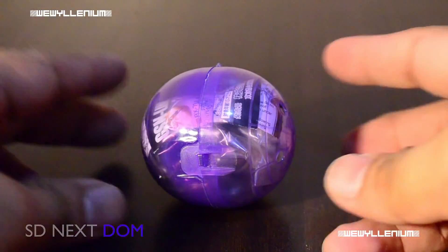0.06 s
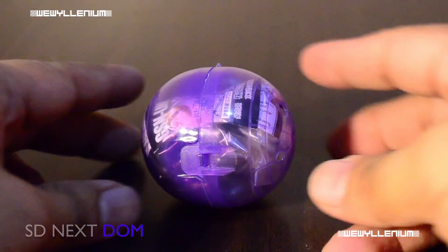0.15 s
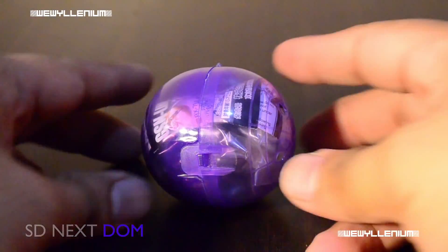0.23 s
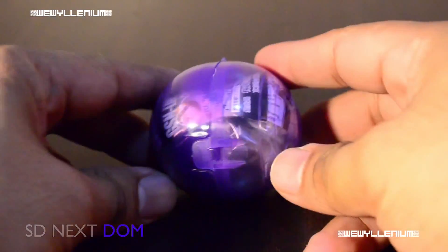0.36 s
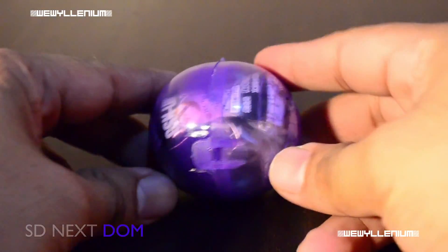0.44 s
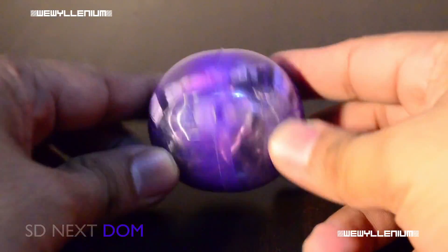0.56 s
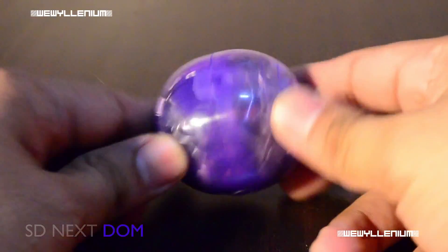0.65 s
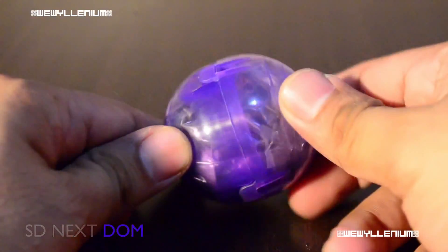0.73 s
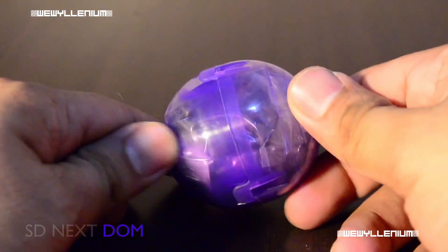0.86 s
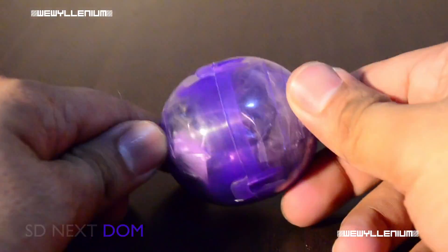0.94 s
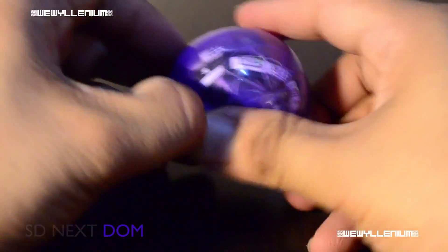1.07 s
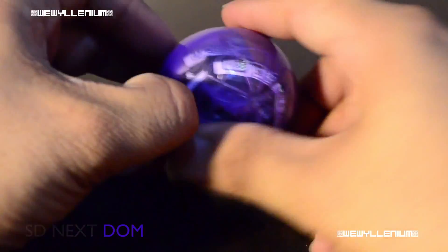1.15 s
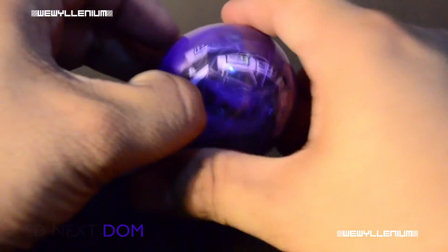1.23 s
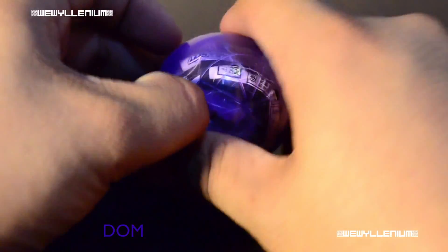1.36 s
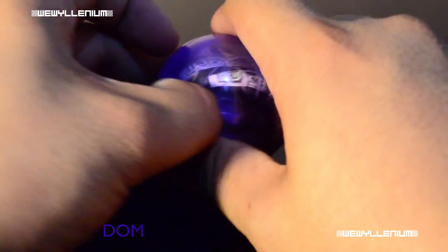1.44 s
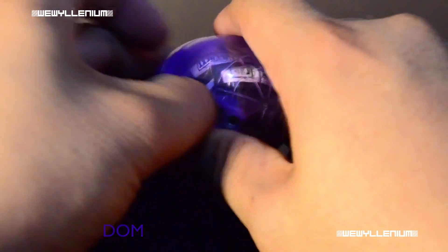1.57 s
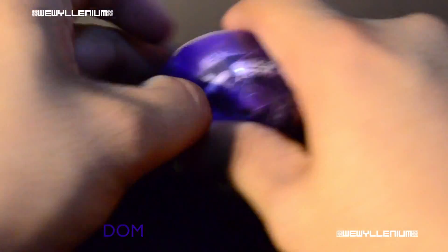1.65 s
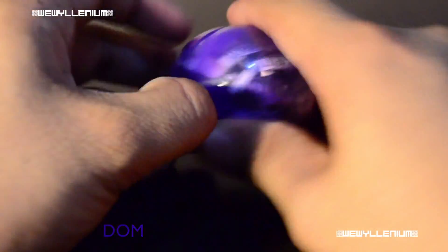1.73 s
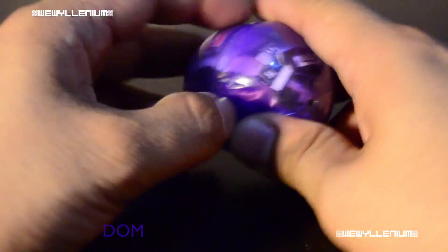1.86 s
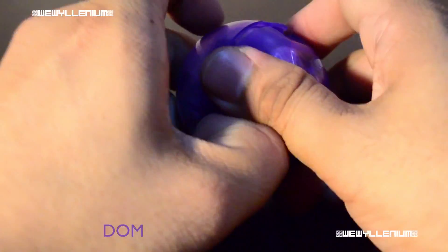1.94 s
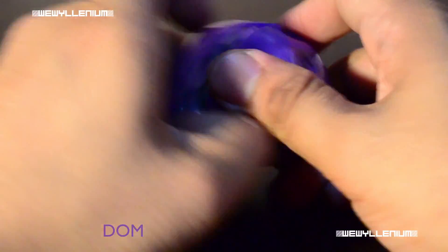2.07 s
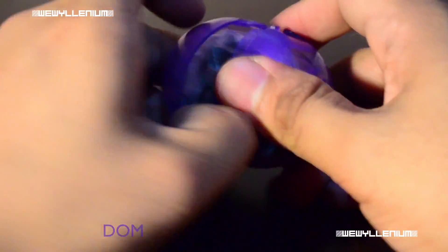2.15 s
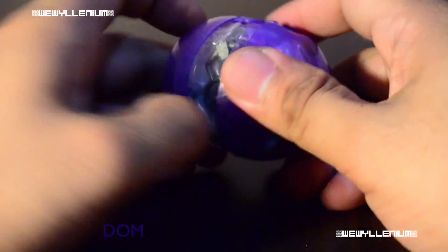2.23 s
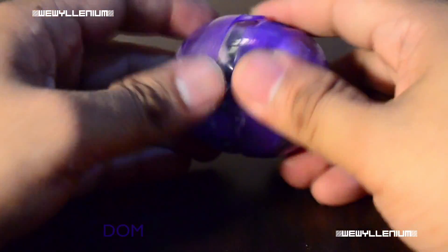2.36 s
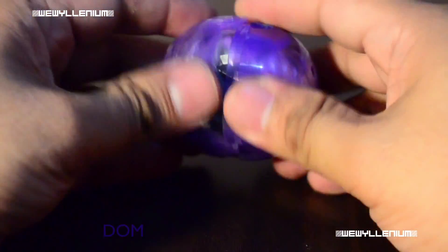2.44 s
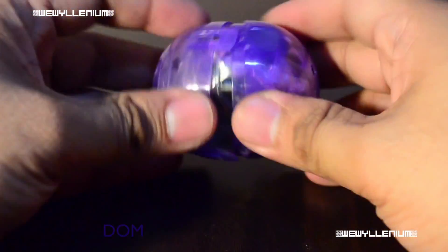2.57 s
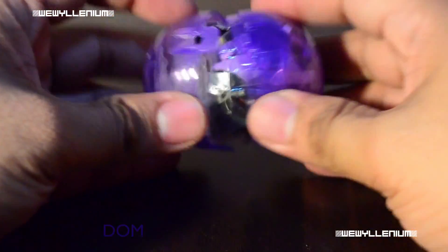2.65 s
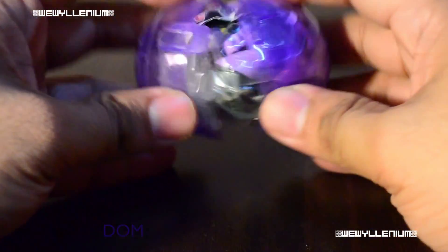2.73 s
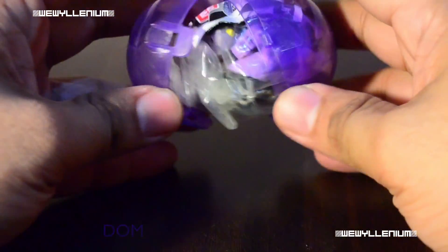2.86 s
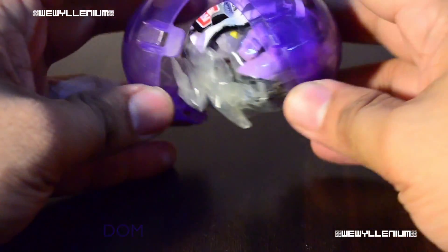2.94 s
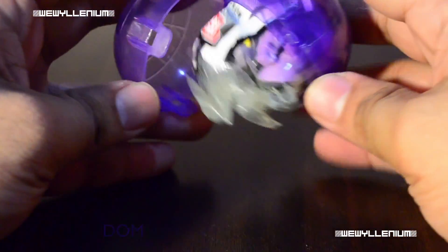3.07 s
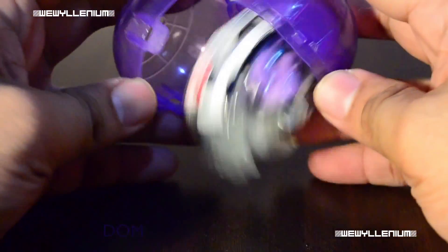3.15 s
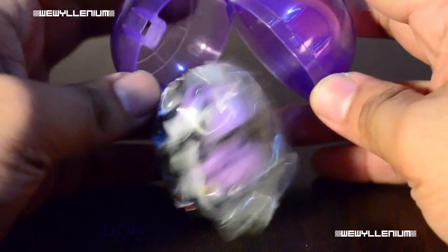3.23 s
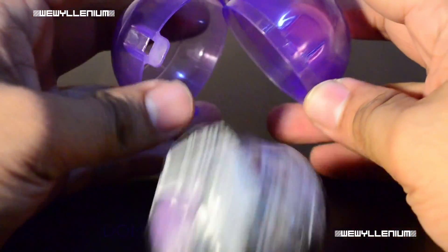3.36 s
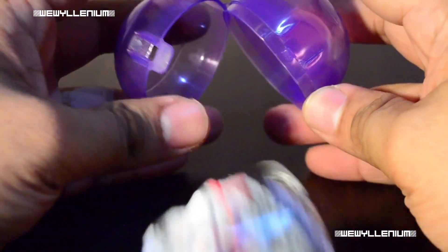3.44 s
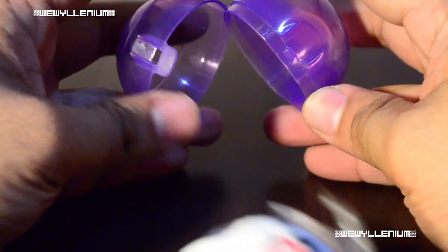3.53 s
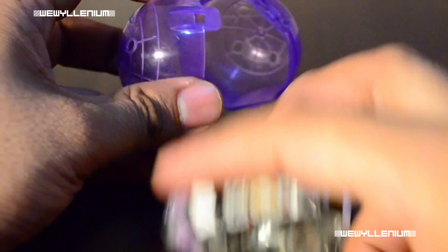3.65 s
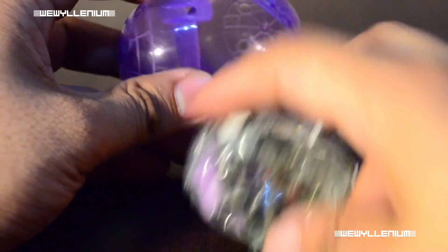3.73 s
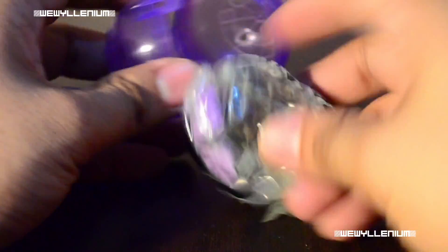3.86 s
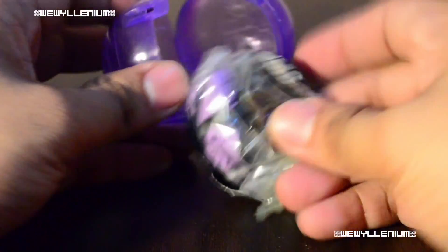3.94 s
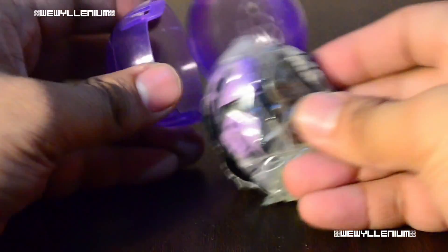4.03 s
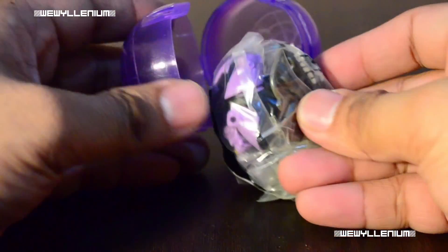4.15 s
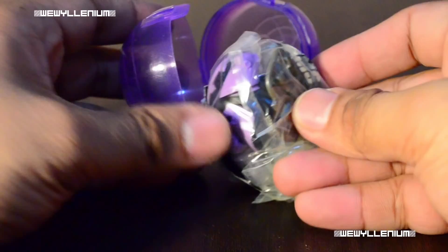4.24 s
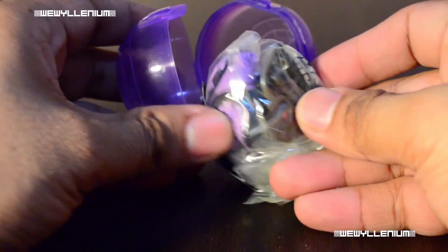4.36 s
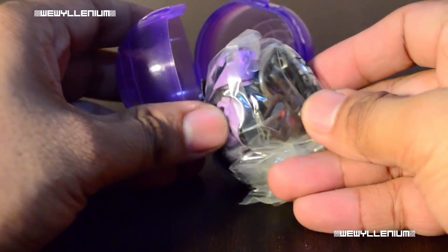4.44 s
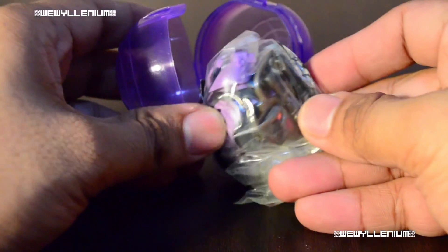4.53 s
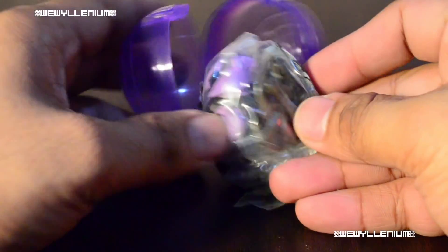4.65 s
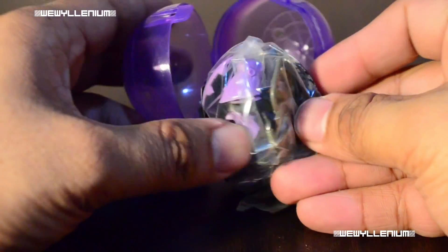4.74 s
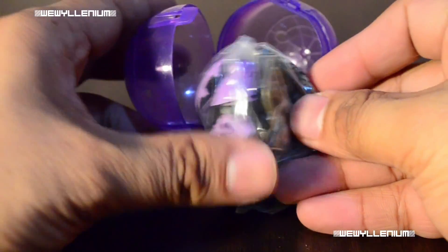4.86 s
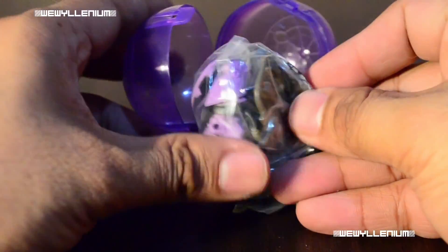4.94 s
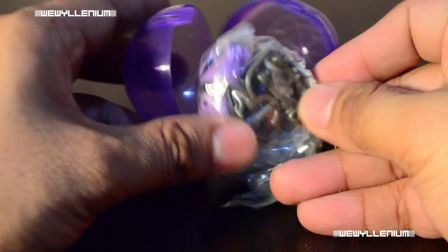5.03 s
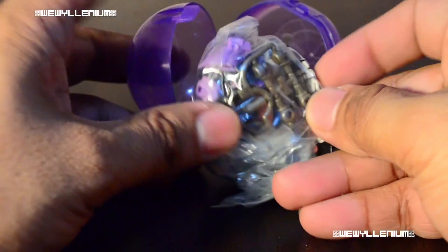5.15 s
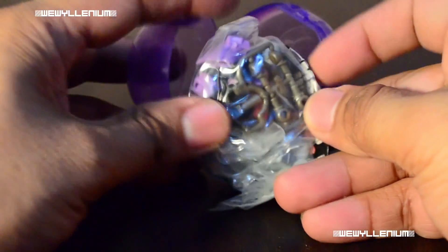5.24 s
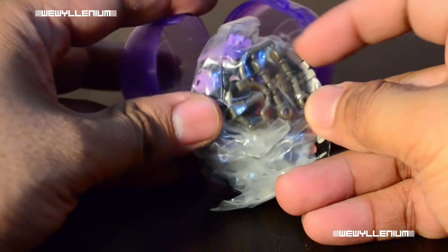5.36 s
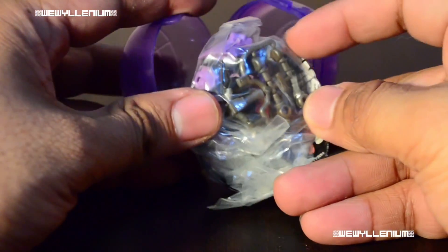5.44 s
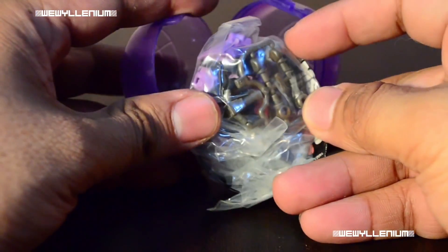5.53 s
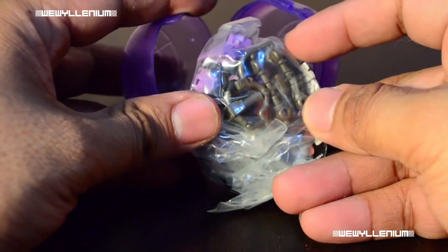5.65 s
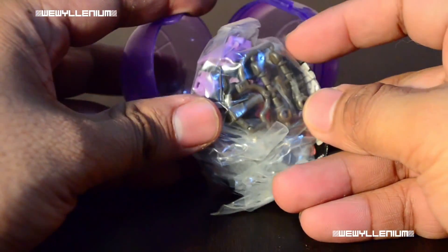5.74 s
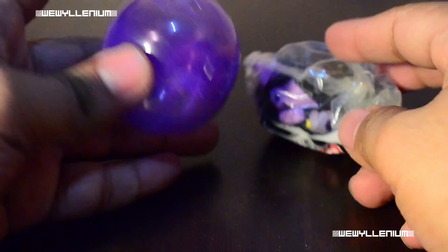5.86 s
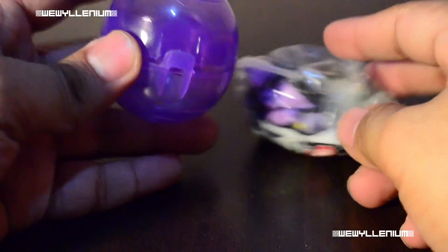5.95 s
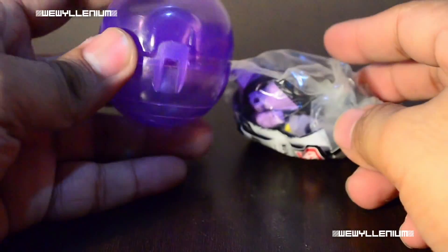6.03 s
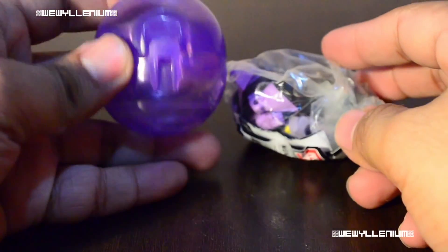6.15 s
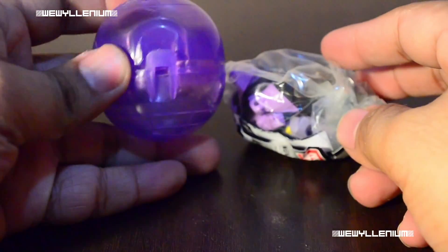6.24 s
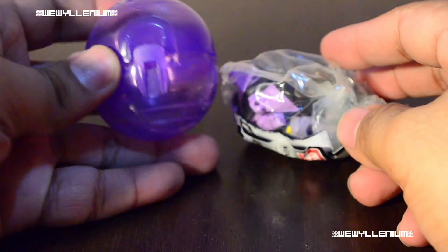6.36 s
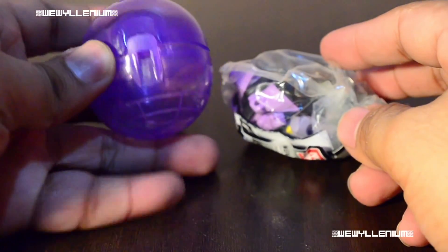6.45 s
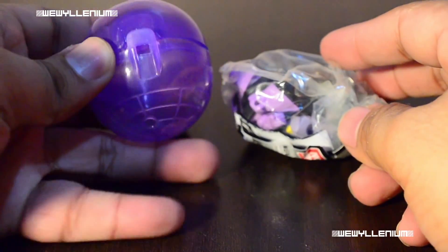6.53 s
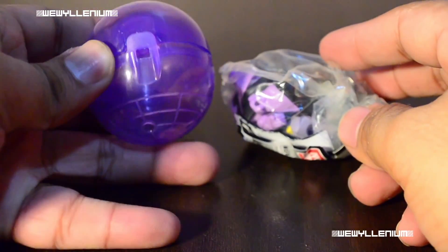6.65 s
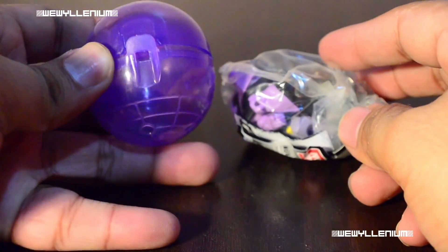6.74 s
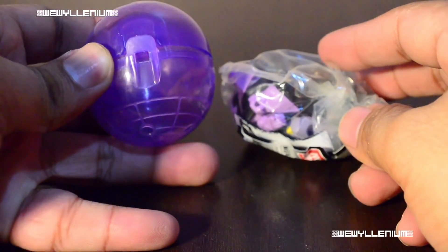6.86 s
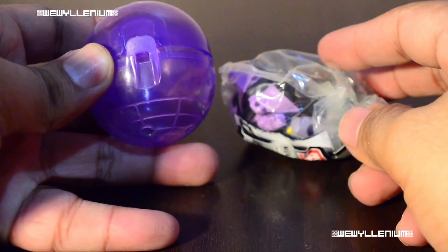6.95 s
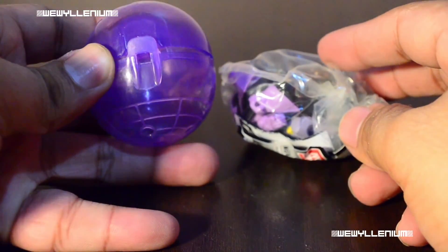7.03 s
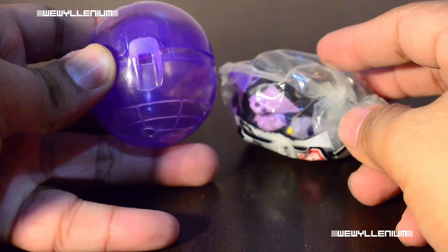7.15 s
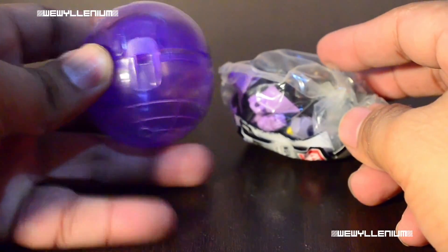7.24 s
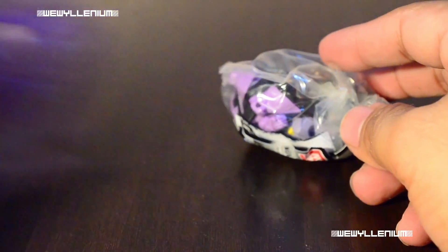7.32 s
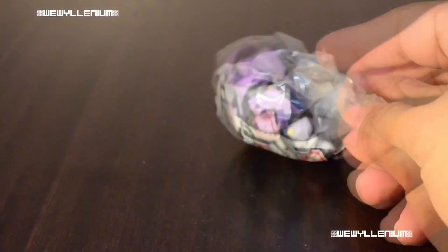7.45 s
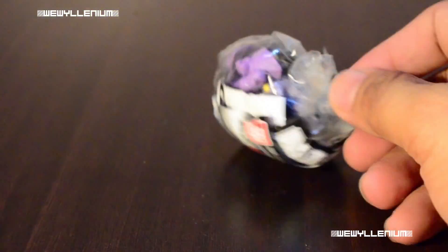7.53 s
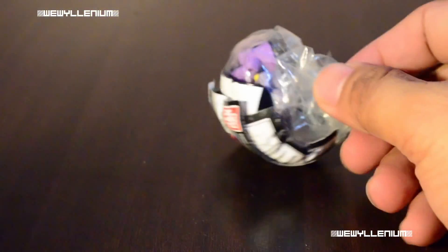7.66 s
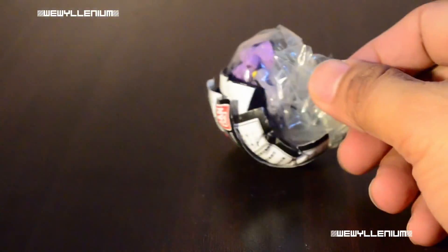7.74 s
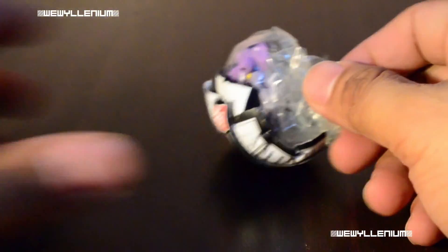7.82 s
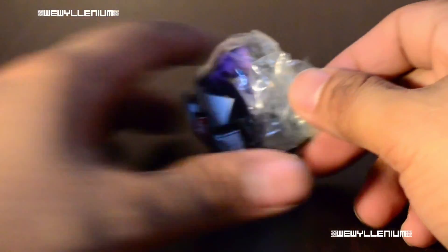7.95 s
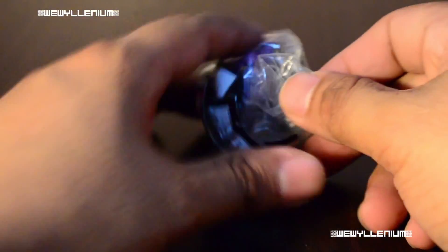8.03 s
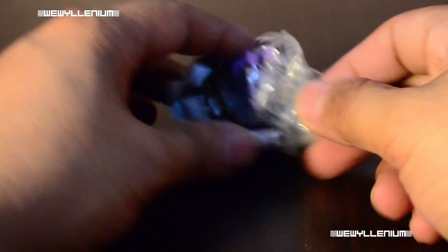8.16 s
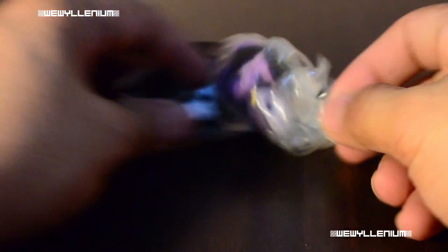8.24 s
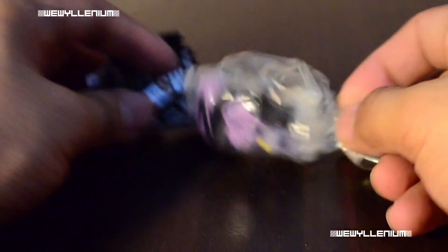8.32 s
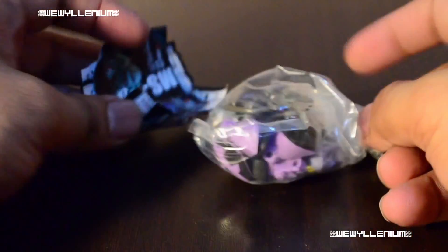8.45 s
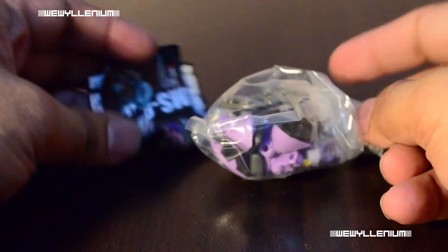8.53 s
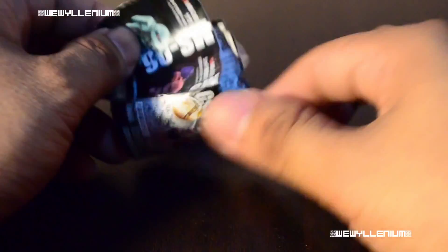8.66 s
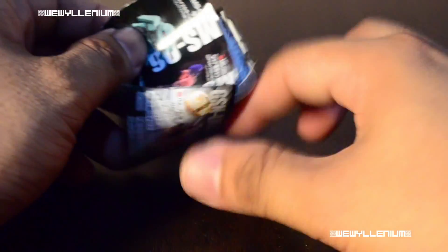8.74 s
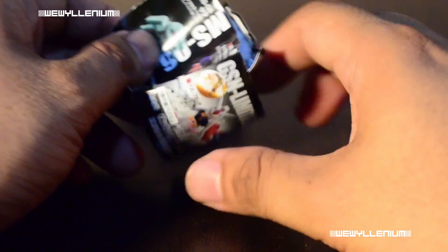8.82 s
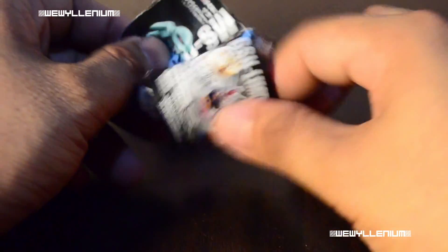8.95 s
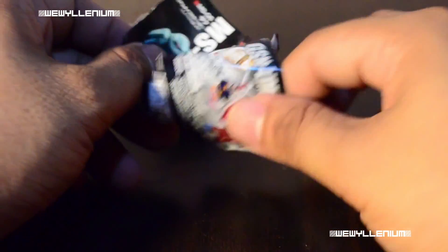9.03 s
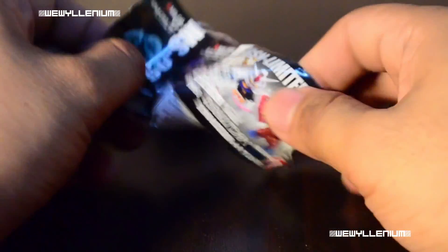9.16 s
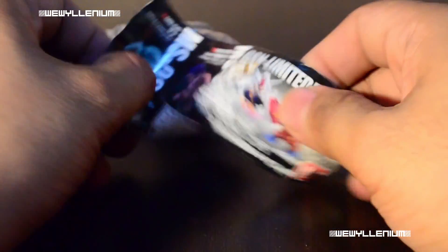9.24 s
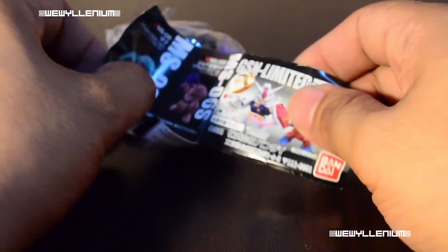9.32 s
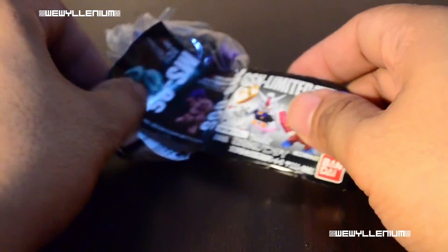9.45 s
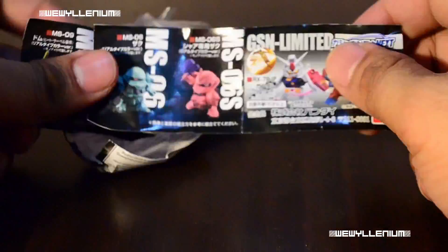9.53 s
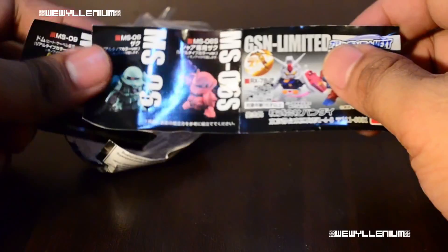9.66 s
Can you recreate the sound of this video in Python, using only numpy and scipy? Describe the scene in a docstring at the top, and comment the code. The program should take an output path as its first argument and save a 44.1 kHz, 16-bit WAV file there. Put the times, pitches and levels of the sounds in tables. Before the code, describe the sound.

Close up on a table, fingers rub and pop open a plastic shell, then thin wrapping crackles and folded paper rustles open in a small room.

```python
"""A hollow plastic toy capsule is prised open over a table in a small, hard-walled room: its catch snaps
three times, each snap a short body ring plus a bright noise crack. A figure in a crackly plastic bag is
pulled out and turned over (clumped ticks ringing small facets), the empty shell is set aside with modal
table knocks, and a folded paper leaflet is peeled off the bag and opened (finer ticks, two hollow pops).
Dense wall echoes, steady room air, hiss and a thin whine lie behind."""
import sys
import numpy as np
from scipy import signal
from scipy.fft import rfft, irfft
from scipy.io import wavfile

SR = 44100
rng = np.random.default_rng(int(sys.argv[2]) if len(sys.argv) > 2 else 0)


def log_audio(samples):
    """Write samples as a 16-bit WAV file to the path given in sys.argv[1]."""
    # one column per channel
    frames = np.atleast_2d(samples).T
    # limit to full scale, then quantise
    limited = np.clip(frames, -1, 1)
    pcm = np.round(limited * 32767).astype(np.int16)
    wavfile.write(sys.argv[1], SR, pcm)


N = 427329
TIME = np.arange(N) / SR

# Colour of hiss on the shell and fine crackle of the bag. Each row: frequency in Hz, relative density in dB.
SIZZLE_COLOUR = [(1500, -7.5), (3000, -14.5), (4500, 0), (6500, -1.5), (8500, -2.5), (10500, -8),
                 (13000, -23.5), (16000, -43)]


def capsule():
    """The stiff shell: hollow snaps and the rub of sliding contact. Gives (direct, sent to the room)."""
    # Taps on the shell and snaps of its catch. Each row: start in seconds, body level in dB,
    # body pitch in Hz, edge level in dB; levels before layer gain.
    shell_snaps = [(0.075, -47, 760, -59), (1.079, -50.5, 2330, -51), (1.29, -43.5, 1810, -41.5),
                   (1.4569, -49, 1260, -56), (1.6254, -36.5, 870, -25.5), (1.6283, -13, 950, -22),
                   (1.814, -42, 1280, -49), (1.8362, -11.5, 1210, -21.5), (2.1332, -6.5, 1240, -14.5),
                   (2.1368, -22, 1120, -36.5), (2.2634, -41.5, 1800, -47), (2.3485, -39.5, 1360, -41),
                   (2.544, -34.5, 1340, -57), (2.555, -44, 1300, -63), (2.584, -36, 1310, -58),
                   (2.7256, -53, 1610, -59), (2.7456, -49, 1650, -58)]
    # Colour of the shell's crack. Each row: frequency in Hz, relative density in dB.
    shell_edge_colour = [(900, -16.5), (2000, -7.5), (2900, 8), (4200, -6.5), (6500, 0), (8500, -2),
                         (10500, -8), (13000, -23), (16000, -28.5)]
    # Fingertips sliding on the shell, and at 3.1 s the bag sliding faintly. Each row: strongest moment
    # in seconds, length in seconds, rub level in dB, hiss level in dB; levels before layer gain.
    slides = [(.4, 0.33, -57.5, -64), (.545, 0.054, -46, -61), (.765, 0.19, -50, -64),
              (.95, 0.22, -75, -61), (1.1, .05, -53, -51.5), (1.3, 0.048, -41.5, -53),
              (1.495, 0.2, -55.5, -65), (1.78, 0.13, -52.5, -63), (2.346, 0.054, -49, -51),
              (2.53, 0.17, -52.5, -59), (2.595, 0.032, -54, -63), (2.72, 0.51, -60, -64),
              (3.1, 0.26, -63.5, -62.5), (6.565, 0.13, -55.5, -60), (7.94, 0.27, -52, -56.5)]
    # Colour of the rub. Each row: frequency in Hz, relative density in dB.
    rub_colour = [(150, -13), (270, 2.5), (500, 2), (900, 3.5), (1500, 5), (2500, -0.5), (4500, -5.5),
                  (9000, -33)]
    cavity_hz, cavity_width_hz, cavity_db = 397, 130, -1.5  # the air inside the shell

    hits = cracks(shell_snaps, hz=6060, t60_s=0.031)
    body, edge, body_wide, edge_wide = snaps(
        hits, shell_edge_colour, scatter=0.6, body_width_hz=440,
        edge_focus=0.51, edge_width_hz=980, edge_length=0.71)
    body = body + from_db(cavity_db) * resonate(body, cavity_hz, cavity_width_hz)

    rub_gain, hiss_gain = strokes(slides, rise=0.51)
    rub = crackle(rub_colour, per_s=5500, spread_db=4.5, clump_db=5, smooth=.9, sharpness=2.7)
    hiss = crackle(SIZZLE_COLOUR, per_s=1500, spread_db=1.0, clump_db=7.5, smooth=.8, sharpness=3.1)
    slide = from_db(-1.0) * rub_gain * rub + from_db(-3.0) * hiss_gain * hiss

    direct = from_db(-0.8) * body + from_db(-3.0) * edge + slide
    sent = from_db(-0.5) * body_wide + from_db(-0.45) * edge_wide + slide
    return direct, sent


def cracks(rows, hz, t60_s):
    """Brighter snaps slip at a higher pitch for longer; hz and t60_s hold where edge and body are equal."""
    hz_doubles_db, t60_doubles_db = 18.5, 23  # dB of edge over body for each doubling
    rows = np.array(rows)
    _, body_db, _, edge_db = rows.T
    bright_db = edge_db - body_db
    return np.c_[rows, hz * 2 ** (bright_db / hz_doubles_db), t60_s * 2 ** (bright_db / t60_doubles_db)]


def snaps(rows, edge_colour, scatter, body_width_hz, edge_focus, edge_width_hz, edge_length, size=2205):
    """A snap rings the body for a few cycles while the slipping edge gives a bright crack.
    Gives body and edge as heard directly, then as spread into the room."""
    build_s = 0.0018  # a slip spreads along the edge before the crack is at full strength
    mean_bounce_s = .0007  # each crack also arrives off the table top
    out, t, pulse = np.zeros((4, N)), np.arange(size) / SR, signal.unit_impulse(size)
    noises = rng.standard_normal((len(rows), 2, size))
    facets = 2400 * 4 ** rng.random((len(rows), 3))
    delays = mean_bounce_s * (.5 + rng.random(len(rows)))

    def attack_one(v):
        """Unit RMS over the first 5 ms."""
        return v / np.sqrt(np.mean(v[:220] ** 2))

    def spread(smooth, heard):
        """Summed over all directions the same energy has a smooth spectrum."""
        return smooth * np.linalg.norm(heard) / np.linalg.norm(smooth)

    for (s, body_db, body_hz, edge_db, edge_hz, t60_s), noise, facet_hz, delay_s in zip(
            rows, noises, facets, delays):

        def body(push):
            """Two resonances in series at the body pitch."""
            ring = resonate(push, body_hz, body_width_hz)
            return attack_one(resonate(ring, body_hz, 2 * body_width_hz))

        def edge(push):
            """Every spot that gives way also rings a few small facets of its own."""
            tinted = push + 1.5 * sum(resonate(push, hz, 550) for hz in facet_hz)
            focus = attack_one(resonate(push, edge_hz, edge_width_hz))
            return attack_one(attack_one(tinted) + edge_focus * focus)

        # one main release, then a shudder of smaller slips
        shudder = body(noise[0] * fade(t, t60_s))
        knock = attack_one(body(pulse) + scatter * shudder)
        slip = noise[1] * fade(t, t60_s * edge_length) * (1 - fade(t, build_s))
        crack = edge(colour(slip, edge_colour))
        knock_wide = spread(body(pulse), knock)
        crack_wide = spread(edge(colour(pulse, edge_colour)), crack)
        parts = knock, off_table(crack, delay_s), knock_wide, crack_wide
        for track, part, db in zip(out, parts, (body_db, edge_db) * 2):
            add(track, s, from_db(db) * part)
    return out


def off_table(x, delay_s):
    """The direct sound plus its reflection from the table top, scaled back for the added energy."""
    n, gain = np.arange(len(x)), from_db(-9)
    bounce = np.interp(n - round(delay_s * SR), n, x, left=0)
    return (x + gain * bounce) / np.hypot(1, gain)


def wrapping():
    """Thin film: loud buckles amid fine crackle, and a faint squeak. Gives (direct, sent to the room)."""
    # Loudest creases of bag and paper buckling. Each row: start in seconds, body level in dB,
    # body pitch in Hz, edge level in dB; levels before layer gain.
    creases = [(2.8036, -30.5, 1720, -28), (2.9543, -72, 1900, -55.5), (3.1852, -42, 1500, -50.5),
               (3.3029, -32.5, 1720, -29.5), (3.5003, -48.5, 2000, -38.5), (3.5796, -45.5, 1360, -54),
               (3.6551, -42, 1220, -50), (3.8237, -39, 1850, -47), (3.9135, -36.5, 2030, -36),
               (3.939, -38, 1710, -38.5), (4.006, -37, 2070, -34.5), (4.0297, -36.5, 2050, -29),
               (4.1004, -36.5, 2160, -29), (4.2449, -42.5, 1690, -66), (4.2713, -42, 1840, -42),
               (4.2777, -48, 1330, -30.5), (4.4522, -40, 1980, -36), (4.5071, -38, 1020, -43),
               (4.5397, -46.5, 890, -34.5), (4.5586, -44, 1640, -42), (4.7103, -41, 2030, -39.5),
               (4.7788, -50, 2280, -38.5), (4.8582, -48, 2190, -45.5), (4.8098, -40, 2210, -52),
               (4.9099, -32, 1470, -39.5), (4.9442, -34.5, 1680, -39), (5.0249, -36.5, 1380, -41.5),
               (5.0719, -37.5, 1940, -30.5), (5.0983, -32.5, 2360, -28.5), (5.179, -39.5, 1420, -52),
               (5.2339, -31.5, 1050, -55), (5.2685, -45, 1770, -42), (5.3068, -35.5, 2200, -31),
               (5.3509, -35, 1370, -64), (5.5505, -43.5, 1980, -50), (5.828, -58.5, 1980, -58),
               (6.0692, -45.5, 1247, -45), (7.5772, -55, 2880, -40), (7.5936, -38.5, 1630, -40),
               (7.6996, -52.5, 1862, -52), (8.0425, -41, 1680, -39.5), (8.1222, -47, 1700, -40.5),
               (8.225, -37.5, 2400, -53), (8.244, -20, 1340, -23.5), (8.2705, -31.5, 2800, -35),
               (8.2857, -33, 1280, -31.5), (8.44, -38, 2000, -40.5), (9.0106, -48, 1550, -35),
               (9.0261, -43, 1180, -38.5), (9.076, -44, 1330, -43), (9.1296, -40.5, 1080, -43),
               (9.2951, -33.5, 970, -30), (9.3249, -42, 1090, -32), (9.4213, -42, 2560, -42.5),
               (9.4624, -44.5, 3060, -40)]
    # Colour of the creases' cracks. Each row: frequency in Hz, relative density in dB.
    crease_edge_colour = [(100, -34), (500, -29), (1200, 1), (2500, -2.5), (4000, 1), (6500, -2.5),
                          (8500, -1), (10500, -6), (13000, -21), (16000, -25.5)]
    # The bag squeezed or dragged. Each row: strongest moment in seconds, length in seconds,
    # crumple level in dB, sizzle level in dB; levels before layer gain.
    handling = [(3.317, 0.027, -34.5, -42), (3.37, 0.091, -56, -49.5), (3.515, 0.03, -36, -66),
                (3.77, 0.1, -52, -54), (3.86, 0.081, -42, -47), (3.9, 0.094, -43.5, -44),
                (4.285, 0.059, -65, -64), (4.75, .06, -46.5, -52), (4.93, .055, -35.5, -48),
                (5.1, 0.088, -37.5, -42), (5.322, 0.028, -36.5, -61), (6.035, 0.089, -45, -42.5),
                (6.17, 0.061, -60.5, -56.5), (7.63, .2, -69, -70), (8.06, 0.13, -43, -48.5),
                (8.18, .13, -50.5, -51), (8.28, 0.13, -33, -35), (8.385, 0.067, -34, -43)]
    # Colour of the crumpling. Each row: frequency in Hz, relative density in dB.
    crumple_colour = [(150, -25), (400, -5.5), (800, 3), (1400, 5.5), (2200, 4.5), (3300, 1), (5000, -15.5),
                      (9000, -30)]
    # The bag squeaking under the fingers. Each row: strongest moment in seconds, length in seconds,
    # level in dB before layer gain.
    squeaks = [(7.5, 0.042, -58), (7.92, 0.05, -53), (8.01, 0.097, -57), (8.167, 0.14, -55)]
    squeak_hz, squeak_width_hz = 730, 64

    buckles = cracks(creases, hz=5300, t60_s=0.012)
    body, edge, body_wide, edge_wide = snaps(
        buckles, crease_edge_colour, scatter=0.78, body_width_hz=660,
        edge_focus=0.54, edge_width_hz=3100, edge_length=1.0)

    grip_gains = np.outer(from_db([-3, -6]), from_db(grip_db(TIME)))  # crumple, sizzle
    crumple_gain, sizzle_gain = strokes(handling, rise=0.44) + grip_gains
    folds = crackle(crumple_colour, per_s=1200, spread_db=4.5, clump_db=2.5, smooth=.15, sharpness=5)
    wrinkles = crackle(SIZZLE_COLOUR, per_s=1200, spread_db=4.5, clump_db=3, smooth=.15, sharpness=6)
    rustle = from_db(0.5) * crumple_gain * folds + from_db(0.5) * sizzle_gain * wrinkles

    squeal = resonate(rng.standard_normal(N), squeak_hz, squeak_width_hz)
    squeal = rms_one(resonate(squeal, squeak_hz, squeak_width_hz))
    rustle = rustle + from_db(2.0) * strokes(squeaks, rise=0.38)[0] * squeal

    direct = from_db(3.0) * body + from_db(-0.04) * edge + rustle
    sent = from_db(1.5) * body_wide + from_db(1.2) * edge_wide + rustle
    return direct, sent


def grip_db(s):
    """How hard the fingers work the bag at time s; at -120 dB before and after."""
    # Finger effort on the bag. Each row: time in seconds, crackle level in dB before layer gain.
    grip = [(3.18, -50), (3.38, -55), (3.45, -50), (3.59, -60), (3.78, -55), (3.93, -54.5), (4.02, -48),
            (4.56, -59.5), (5.0, -54), (5.2, -58), (5.41, -53), (5.57, -68), (5.84, -77), (6.0, -57)]
    return np.interp(s, *np.transpose(grip), left=-120, right=-120)


def paper():
    """Stiff glossy paper: the sheet flaps while its fibres catch in a dense, fine grain.
    Gives (direct, sent to the room)."""
    # The leaflet sliding and unfolding. Each row: strongest moment in seconds, length in seconds,
    # flap level in dB, rustle level in dB; levels before layer gain.
    leaflet = [(7.41, 0.15, -46.5, -47.5), (7.48, 0.15, -50, -45.5), (8.455, 0.28, -48, -45),
               (8.65, 0.13, -49.5, -50.5), (8.722, 0.034, -36.5, -40.5), (8.78, 0.12, -43, -43.5),
               (8.822, 0.018, -56, -32.5), (8.862, 0.038, -42.5, -30.5), (8.95, 0.072, -46, -45.5),
               (9.03, 0.11, -43, -43), (9.18, 0.15, -42, -46), (9.32, 0.14, -37, -38.5),
               (9.475, 0.2, -47.5, -49.5), (9.63, 0.24, -55.5, -56.5)]
    # Colours of flap and rustle. Each row: frequency in Hz, relative density in dB.
    flap_colour = [(150, -6), (450, -1), (900, 1.5), (1500, 4.5), (2300, 2), (4000, 2), (9000, -65)]
    rustle_colour = [(1200, -31), (2400, -7), (3400, -4.5), (4800, 1), (6500, -2), (8500, 0), (10500, -9.5),
                     (13000, -18.5), (16000, -28)]
    flap_gain, rustle_gain = strokes(leaflet, rise=0.54)
    bends = crackle(flap_colour, per_s=1800, spread_db=4, clump_db=2, smooth=.25, sharpness=4)
    fibres = crackle(rustle_colour, per_s=1600, spread_db=4.5, clump_db=2.5, smooth=.15, sharpness=8)
    sheet = from_db(-1.5) * flap_gain * bends + from_db(-2.0) * rustle_gain * fibres
    return sheet + sheet_pops(), sheet


def sheet_pops(size=8820):
    """The bent sheet flips over and rings hollowly for a moment: a sine roughened by narrow noise."""
    # The folded leaflet popping as it flexes open. Each row: start in seconds, nominal level in dB,
    # pitch in Hz.
    leaflet_pops = [(9.296, -36, 556), (9.324, -25, 420)]
    out, t = np.zeros(N), np.arange(size) / SR
    for s, db, hz in leaflet_pops:
        flutter = rms_one(resonate(resonate(rng.standard_normal(size), hz, hz / 2), hz, hz))
        ring = 0.4 * np.sin(2 * np.pi * hz * t) + 0.66 * flutter
        envelope = fade(t, 0.074) * (1 - fade(t, 0.009))
        add(out, s, from_db(db) * ring * envelope)
    return out


def strokes(rows, rise):
    """Each movement swells for the share `rise` of its length, then dies away; one gain per level column."""
    fall_db, roundness = 18, 1.33  # drop at either end of the length; 1 = pointed top, 2 = round
    t, gains = TIME[::32], 0
    rise = np.clip(rise, .05, .95)
    for s, length_s, *db in rows:
        away = np.maximum((s - t) / rise, (t - s) / (1 - rise)) / abs(length_s)
        shape_db = -fall_db * np.minimum(away, 10) ** roundness
        gains = gains + np.outer(from_db(db), from_db(shape_db))
    return np.array([np.interp(TIME, t, gain) for gain in gains])


def crackle(spectrum, per_s, spread_db, clump_db, smooth, sharpness, count=32):
    """Tiny slips come in clumps, their rate swinging randomly above and below per_s by about clump_db;
    each gives a tick and rings one facet of the surface, over smooth friction noise."""
    clumping = from_db(abs(clump_db) * drift(45))
    born = rng.random(N) < per_s * clumping / SR
    size_db = spread_db * np.minimum(rng.exponential(1, N), 3.5)
    slips = born * from_db(size_db) * rng.choice([-1, 1], N)
    dealt = rng.integers(0, count, N)  # which facet each slip rings
    facet_hz = np.geomspace(400, 13000, count)
    facets = sum(resonate(slips * (dealt == k), hz, hz / sharpness) for k, hz in enumerate(facet_hz))
    grain = rms_one(rms_one(facets) + .8 * rms_one(slips))
    return rms_one(colour(grain + smooth * rng.standard_normal(N), spectrum))


def table_knocks(size=22050):
    """The table top booms briefly when a hand or the shell meets it; it radiates no deep bass."""
    # Knocks on the table. Each row: start in seconds, nominal level in dB, softness 0-1.
    knocks = [(0.074, -55, 0), (0.384, -47, 0.3), (0.551, -52, 0), (1.287, -53, 0), (1.629, -41, 0.4),
              (2.137, -42, 0), (7.35, -39.5, 0), (7.403, -44, 0.57), (7.503, -38.5, 0.97),
              (7.525, -41.5, 0.83), (7.901, -50.5, 0), (8.039, -49.5, 0.1)]
    # Modes of the table top. Each row: frequency in Hz, relative level in dB, T60 in seconds.
    table_modes = [(250.2, -1.5, 0.42), (88, -19.5, 0.061), (420, -7.5, 0.093)]
    soft_tilt_db_per_octave = 23.5  # in favour of low modes, for softness 1
    out, t = np.zeros(N), np.arange(size) / SR
    for s, db, softness in knocks:
        for hz, mode_db, t60_s in table_modes:
            # contact also scuffs, which roughens the boom
            scuff = rms_one(resonate(resonate(rng.standard_normal(size), hz, hz), hz, 2 * hz))
            boom = .85 * np.sin(2 * np.pi * hz * t) + .4 * scuff
            tilt_db = softness * soft_tilt_db_per_octave * np.log2(table_modes[0][0] / hz)
            envelope = fade(t, t60_s) * (1 - fade(t, 0.017))
            add(out, s, from_db(db + mode_db + tilt_db) * boom * envelope)
    return signal.sosfilt(signal.butter(3, 62, "high", fs=SR, output="sos"), out + 1e-18)


def room(x, first_echo_s, size=22050):
    """Dense wall echoes, dying at their own pace in each octave."""
    # Echo strength. Each row: frequency in Hz, gain in dB.
    echo_gain = [(150, -6.5), (500, -3), (900, -5), (1400, -7.5), (2200, -4), (3500, -1.5), (7000, -5),
                 (10000, -4.5), (15000, -6)]
    # Echo decay. Each row: frequency in Hz, T60 in seconds.
    echo_t60 = [(200, .4), (600, 0.21), (1400, 0.27), (4000, 0.33), (9000, 0.34), (15000, .18)]
    t, hz = np.arange(size) / SR, np.fft.rfftfreq(size, 1 / SR)
    white = rfft(rng.standard_normal(size))
    centres_hz = 125 * 2. ** np.arange(8)
    echo = 0
    for centre_hz, share in zip(centres_hz, np.eye(len(centres_hz))):
        band_gain = at_hz(np.c_[centres_hz, share], hz) * from_db(at_hz(echo_gain, hz))
        band = irfft(white * band_gain)
        onset = np.clip(t / first_echo_s - 1, 0, 1)
        envelope = fade(t, at_hz(echo_t60, centre_hz)) * onset
        echo = echo + band * envelope / np.linalg.norm(envelope)
    return signal.fftconvolve(x, echo)[:N]


def background():
    """Room air and microphone hiss as coloured noise, and a thin electrical whine as a sine."""
    # Colour of the steady noise. Each row: frequency in Hz, relative density in dB.
    air_colour = [(25, -17), (50, -8.5), (120, -2.5), (260, -1), (400, -4), (620, -3), (850, -9),
                  (1350, -1.5), (1520, -11), (2800, -16), (4000, -14), (5000, -22), (6300, -15.5),
                  (8500, -26), (11500, -32), (15000, -41.5)]
    air_db, whine_hz, whine_db = -59.5, 15708, -81
    air = from_db(air_db) * rms_one(colour(rng.standard_normal(N), air_colour))
    return air + from_db(whine_db) * rms_one(np.sin(2 * np.pi * whine_hz * TIME))


def from_db(db):
    """Decibels to amplitude."""
    return 10 ** (np.asarray(db) / 20)


def rms_one(x):
    """Scale to unit RMS."""
    return x / np.sqrt(np.mean(x ** 2) + 1e-20)


def at_hz(points, hz):
    """Read a table on a log-frequency axis."""
    f, value = np.transpose(points)
    return np.interp(np.log(np.maximum(hz, 1)), np.log(f), value)


def fade(t, t60_s):
    """Exponential decay, 60 dB down at t60_s."""
    return np.exp(-np.log(1000) * t / max(t60_s, 1e-3))


def add(out, s, sound):
    """Mix a short sound in at time s."""
    at = max(round(s * SR), 0)
    out[at:at + len(sound)] += sound[:N - at]


def colour(x, spectrum, size=4096):
    """Causal (minimum-phase) filter with the given spectrum, by folding the cepstrum."""
    spectrum_db = at_hz(spectrum, np.fft.rfftfreq(size, 1 / SR))
    cepstrum = irfft(np.log(from_db(spectrum_db)))
    cepstrum[1:size // 2] *= 2
    cepstrum[size // 2 + 1:] = 0
    return signal.fftconvolve(x, irfft(np.exp(rfft(cepstrum))))[:len(x)]


def resonate(x, hz, width_hz):
    """One two-pole resonance, gain about 1 on top."""
    r = np.exp(-np.pi * width_hz / SR)
    zeros = np.array([1, 0, -1]) * (1 - r * r) / 2
    poles = [1, -(1 + r * r) * np.cos(2 * np.pi * hz / SR), r * r]
    return signal.lfilter(zeros, poles, x + 1e-18)


def drift(per_s):
    """Slow random line through per_s normal knots a second, spread near 1."""
    knots = np.arange(0, N / SR + 1, 1 / per_s)
    return np.interp(TIME, knots, rng.standard_normal(len(knots)))


def scene():
    """Everything happens close to the microphone, with the room answering."""
    direct, sent = np.sum([capsule(), wrapping(), paper()], axis=0)
    echoes = room(sent, first_echo_s=0.00081)
    return (direct + echoes + table_knocks() + background())[None]


def record(dry):
    """The microphone port cuts two dips, peaks overload without a bass thump, the top is cut."""
    # Dips of the microphone port. Each row: frequency in Hz, width in Hz, depth 0-1.
    port_dips = [(5700, 500, .8), (6900, 240, .7)]
    full_scale, cutoff_hz = .87, 16300
    x = dry
    for hz, width_hz, depth in port_dips:
        x = x - depth * resonate(x, hz, width_hz)
    excess = x - np.clip(x, -full_scale, full_scale)
    x = x - signal.sosfilt(signal.butter(1, 400, "high", fs=SR, output="sos"), excess + 1e-18)
    return signal.sosfilt(signal.cheby2(14, 60, cutoff_hz + 600, fs=SR, output="sos"), x)


dry = scene()
out = record(dry)
log_audio(out)
```